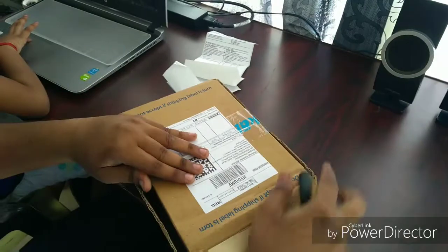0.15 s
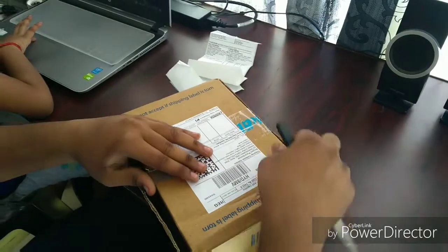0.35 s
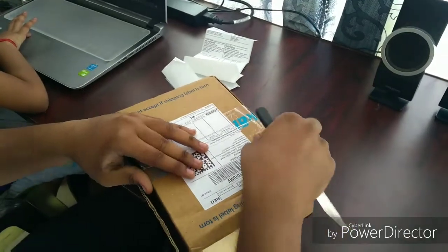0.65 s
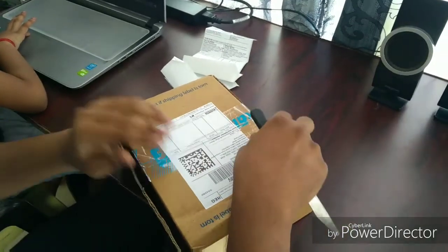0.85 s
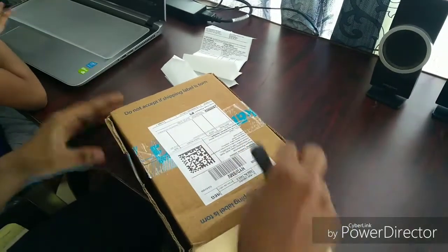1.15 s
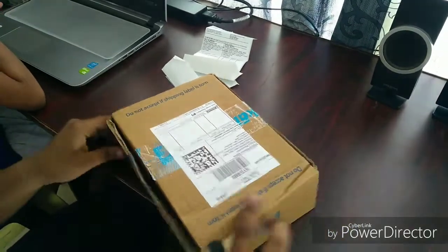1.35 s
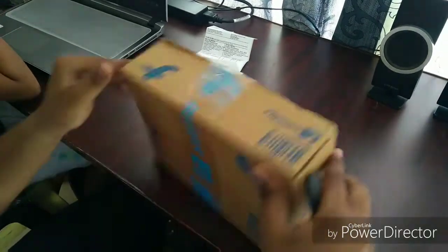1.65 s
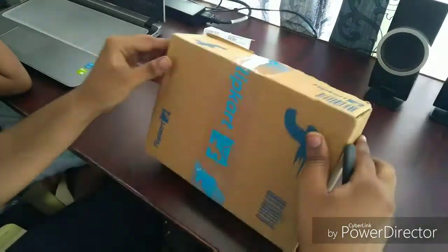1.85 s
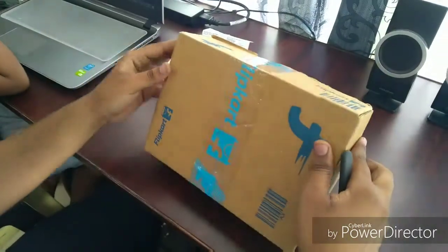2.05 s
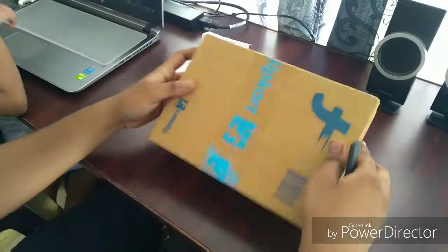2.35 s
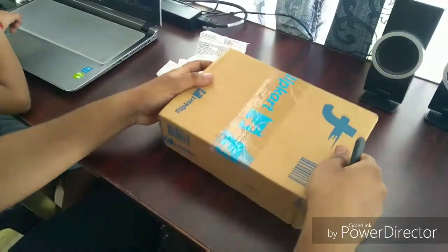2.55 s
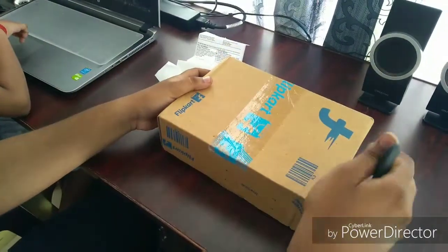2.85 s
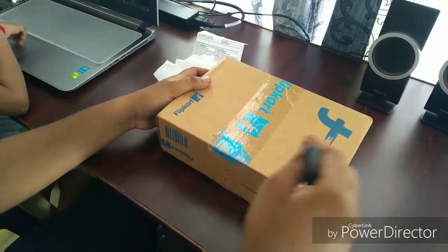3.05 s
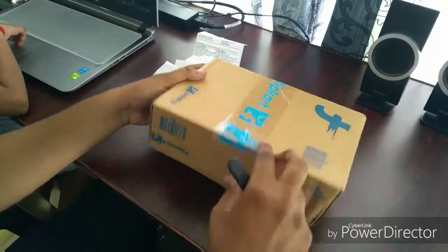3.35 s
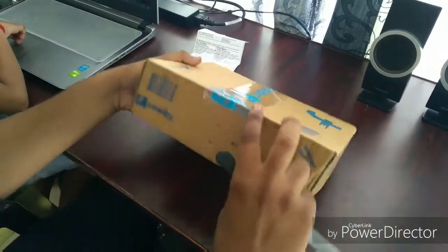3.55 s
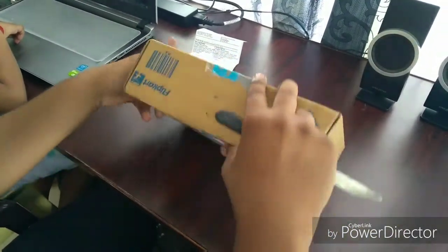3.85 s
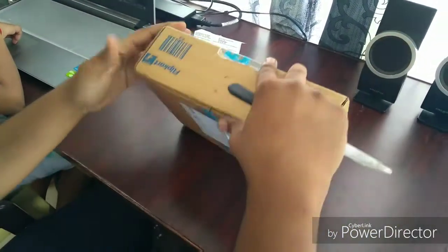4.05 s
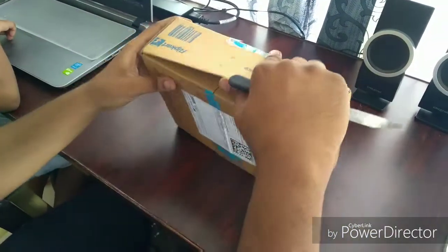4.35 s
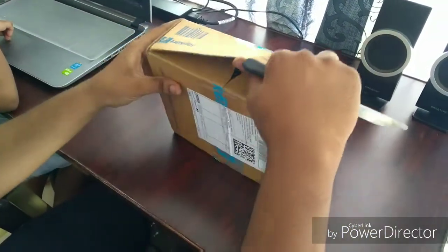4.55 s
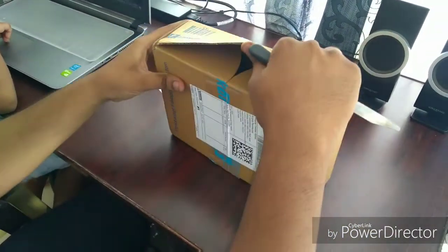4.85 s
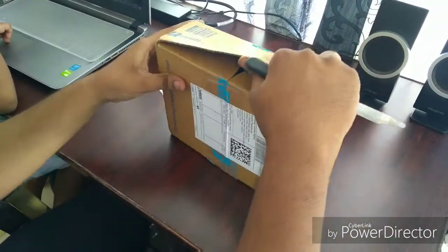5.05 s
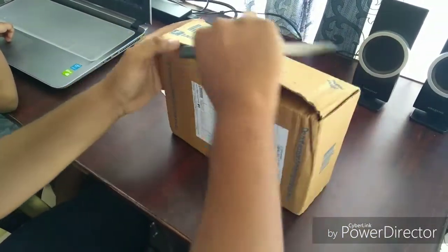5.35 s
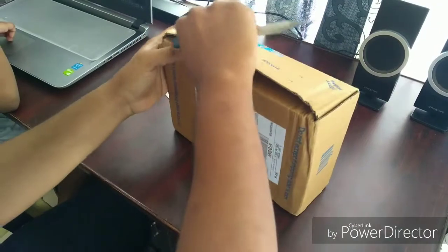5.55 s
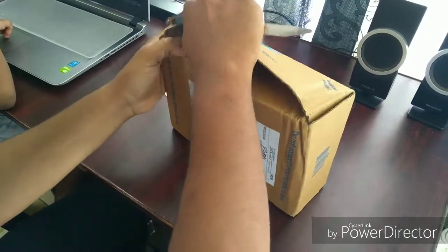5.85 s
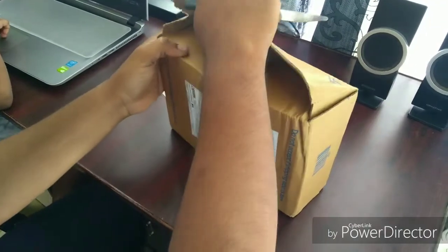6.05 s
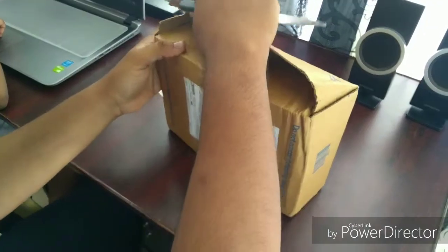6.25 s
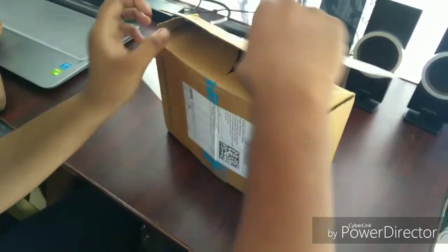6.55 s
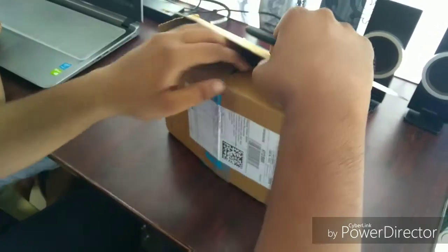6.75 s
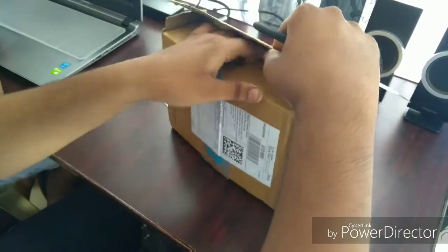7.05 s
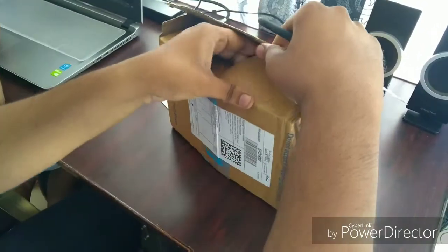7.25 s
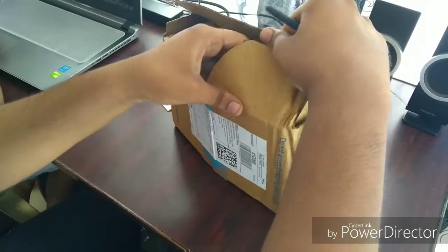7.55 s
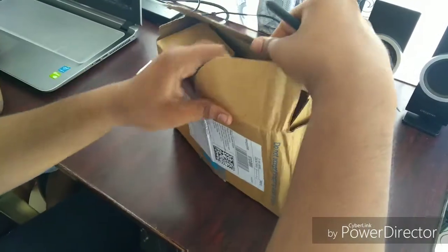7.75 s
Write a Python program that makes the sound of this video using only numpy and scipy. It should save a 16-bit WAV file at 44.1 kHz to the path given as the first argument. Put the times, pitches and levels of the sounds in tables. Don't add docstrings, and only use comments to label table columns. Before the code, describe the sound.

Dry skin-on-paper brushing and tiny ticks open the scene, followed by a flurry of boxy bumps and cardboard hiss as a parcel is flipped on a desk. After softer sliding, taped flaps are forced with sharp snaps and short tears, separated by rustling. The stereo pickup is close, with faint hiss, low room rumble and a short indoor echo; the last flap tears strongly.

```python
import sys
import numpy as np
from scipy import signal
from scipy.fft import rfft, irfft, next_fast_len
from scipy.io import wavfile
from scipy.ndimage import map_coordinates

SR = 44100
rng = np.random.default_rng(int(sys.argv[2]) if len(sys.argv) > 2 else 0)


def unload_audio(sound):
    columns = np.transpose(np.atleast_2d(sound))
    steps = np.round(np.clip(columns, -1, 1) * 32767)
    wavfile.write(sys.argv[1], SR, steps.astype(np.int16))


def invert_db(level):
    return 10 ** (np.asarray(level, dtype=float) / 20)


N = 347949

# centre_hz, width_hz, level_db
WALL_MODES = [(765, 180, -7), (1296, 538, -3), (1749, 788, 0.5), (2099, 885, -1)]
# centre_hz, width_hz, level_db
HOLLOW_MODES = [(156, 49, -6), (250, 52, -2), (345, 59.4, -2.5), (481.6, 82, -2.5), (742, 315, -9.5)]


def along(points, hz):
    f, v = np.transpose(points)
    return np.interp(np.log(hz + 1), np.log(f + 1), v)


def curves(rows):
    s, *cols = np.transpose(rows)
    return [np.interp(np.arange(N) / SR, s, c) for c in cols]


def wobble(rate):
    coarse = np.arange(0, N + 8, 8)
    knots = rng.standard_normal(int(N * rate / SR) + 4)
    return np.interp(np.arange(N), coarse, map_coordinates(knots, [coarse * rate / SR]))


def filtered(x, response):
    m = next_fast_len(N + SR // 2)
    return irfft(rfft(x, m) * response(np.fft.rfftfreq(m, 1 / SR)), m)[..., :N]


def colour(spectrum):
    return lambda hz: invert_db(along(spectrum, hz))


def body(modes):
    low, high = .5 * modes[0][0], 2 * modes[-1][0]

    def response(f):
        edge = (1j * f / low) / (1 + 1j * f / low) / (1 + 1j * f / high) ** 2
        total = 0
        for k, (centre, width, db) in enumerate(modes):
            damping = 1j * f * width
            total = total + (-1) ** k * invert_db(db) * damping / (centre ** 2 - f ** 2 + damping)
        return edge * total
    return response


def ports(pair):
    # pitch_hz, likeness (-1 to 1)
    alike = [(25, .75), (60, .9), (150, 0.75), (380, 0.77), (950, 0.43), (2380, -0.066), (5980, -0.0),
             (15000, -0.02)]
    # pitch_hz, level_db
    port_balance = [(100, 0.6), (2000, 1), (4000, 4), (6500, -12), (9000, 2.7), (14000, -2.2)]

    def mid_and_side(hz):
        turn = np.arccos(np.clip(along(alike, hz), -1, 1)) / 2
        return np.array([np.cos(turn), np.sin(turn)])
    mid, side = filtered(pair, mid_and_side)
    both = np.array([mid + side, mid - side])
    return filtered(both, lambda hz: invert_db(np.outer([.5, -.5], along(port_balance, hz))))


def quiet():
    # pitch_hz, density_db
    tone = [(15, -62.5), (25, -29), (82, -6.5), (150, 3), (250, 3), (520, -18.5), (900, -27), (1100, -47),
            (1800, -48.5), (5500, -57), (6500, -19), (7400, -47), (9000, -51), (15500, -51)]
    # time_s, level_db, pitch_hz
    whine = [
        (1.98, -100, 1960),
        (2.1, -87, 1940),
        (2.32, -90, 1960),
        (2.92, -104, 1954),
        (3.06, -83.5, 1950),
        (3.2, -88, 1930),
        (3.3, -100, 2000),
    ]
    pair = ports(filtered(rng.standard_normal((2, N)), colour(tone)))
    level_db, hz = curves(whine)
    phase = 2 * np.pi * np.cumsum(hz + 34 * wobble(120)) / SR
    whistle = invert_db(level_db + 3.3 * wobble(60)) * np.sin(phase)
    return invert_db(-66.8 + 1.7 * wobble(14)) * pair / np.std(pair.mean(0)) + whistle


def room(x):
    # pitch_hz, t60_s
    decay = [(150, 0.34), (1000, 0.26), (5000, 0.23), (12000, 0.12)]
    hz, t, z = signal.stft(rng.standard_normal((2, SR // 2)), SR, nperseg=256)
    tail = signal.istft(z * invert_db(-60 * t / along(decay, hz)[:, None]), SR, nperseg=256)[1]
    late = np.pad(x, ((0, 0), (150, 0)))
    return signal.fftconvolve(late, tail / np.linalg.norm(tail[0]), axes=1)[:, :N]


def blows():
    # start_s, level_db, face_hz, flap_db, flap_hz
    hits = [(.899, -48.5, 250, -12, 541), (1.451, -31, 346, -6, 452), (1.471, -31.5, 261, -8, 536),
            (1.583, -29, 355, 1.5, 703), (1.76, -26, 262, -1.5, 484), (1.785, -33, 245, -4, 640),
            (1.625, -38, 300, 3, 720), (1.9, -38.5, 250, -19, 441), (2.475, -52.5, 240, -2.5, 727),
            (3.755, -42.5, 251, -6, 484), (4.634, -31, 260, -3, 500), (4.796, -40.5, 260, -7, 533),
            (4.995, -50, 245, -1.5, 487), (5.22, -46.5, 347, -5.5, 659), (5.882, -46, 371, 6, 541),
            (6.064, -49, 328, 2.5, 484), (6.138, -29, 398, 9, 523), (7.254, -50, 380, 8, 530),
            (7.35, -47, 360, 7, 545), (7.427, -39.5, 363, -8, 487), (7.48, -43, 393, -4, 484),
            (7.542, -31, 364, -15, 452), (7.608, -32.5, 358, -4, 553), (7.771, -32, 250, -3, 751)]
    # start_s, level_db, desk_hz, flap_db
    bumps = [(.167, -39.5, 136, -6), (.223, -44, 159, -4), (.68, -55, 130, -15), (1.97, -48, 110, -15),
             (3.4, -52, 110, -15), (5.93, -46, 100, -15), (2.61, -56, 130, -15), (4.0, -52, 130, -15),
             (5.34, -48, 140, -15), (5.616, -45.5, 138, -4), (6.791, -44, 134, -7.5), (6.14, -35, 150, -20),
             (7.772, -39, 155, -15), (6.895, -42, 110, -23), (6.915, -47, 119, -23), (6.946, -56, 110, .6),
             (7.023, -41, 137, -14)]
    bump_flap_hz = 520
    return hits + [(*row, bump_flap_hz) for row in bumps]


def shaken():
    blow_to_desk_db, db_per_octave, t60_s = -6, 8, .4
    t = np.arange(0, N, 32) / SR
    gain = 0
    for s, db, hz, *_ in blows():
        start_db = db + blow_to_desk_db - db_per_octave * np.log2(hz / 130)
        gain = gain + (t > s) * invert_db(start_db - 60 * np.abs(t - s) / t60_s)
    return np.interp(np.arange(N) / SR, t, gain)


def knocks():
    hard_t60_s, softer_s_per_db = .036, .0012
    left_lag = 5
    swing, rattle = np.zeros(N + SR), np.zeros(N + SR)
    t = np.arange(SR // 3) / SR
    for s, db, face_hz, flap_db, flap_hz in blows():
        t60 = max(hard_t60_s + softer_s_per_db * (-25 - db), .015)
        start = round(s * SR) + 60
        at = slice(start, start + len(t))
        face = np.sin(2 * np.pi * face_hz * t)
        flap = invert_db(flap_db) * np.sin(2 * np.pi * flap_hz * t)
        swing[at] += invert_db(db + 4 - 60 * t / t60) * (1 - np.exp(-t / 0.00061)) * (face + flap)
        rattle_db = db + max(flap_db, 0) + 13
        rattle[at] += invert_db(rattle_db - 60 * t / (3.43 * t60)) * rng.standard_normal(len(t))
    airy = lambda f: (1j * f / 90) ** 2 / (1 + 1j * f / 90) ** 2
    box = filtered(swing[:N], airy) + filtered(rattle[:N], body(HOLLOW_MODES))
    return np.array([np.roll(box, left_lag), box]) * invert_db([[.8], [-.8]])


def strokes():
    # peak_s, rub_db, wall_db, rise_s, fall_s
    slides = [(.1, -53, -57, .4, .1), (.17, -57, -56, .08, .04), (.235, -55, -56, .015, .08),
              (.394, -61.5, -66, .03, .075), (.56, -79, -99, .015, .1), (.64, -75, -95, .012, .04),
              (.69, -73, -78, .015, .12), (.77, -67, -79, .03, .15), (.854, -64, -75, .05, .04),
              (.934, -63, -76, .11, .11), (1.0, -76, -90, .1, .15), (1.12, -74, -90, .05, .09),
              (1.27, -89, -99, .03, .08), (1.42, -68, -84, .11, .25), (1.475, -52, -58, .03, .3),
              (1.575, -47, -58, .07, .17), (1.768, -48.5, -56, .05, .25), (1.7, -56, -66, .15, .1),
              (1.98, -63, -73, .21, .17), (2.13, -78, -84, .1, .1), (2.21, -73, -78, .03, .15),
              (2.3, -62, -80, .09, .12), (2.425, -57.5, -80, .03, .3), (2.565, -55, -62, .15, .14),
              (2.7, -65, -74, .21, .17), (3.1, -86, -94, .8, .4), (3.3, -62, -78, .11, .4),
              (3.62, -49, -66, .42, .4), (3.774, -52, -56, .15, .21), (3.924, -51, -66, .08, .19),
              (4.08, -61, -58, .06, .06)]
    # peak_s, rub_db, wall_db, rise_s, fall_s
    pulls = [(4.12, -66, -72, .3, .25), (4.35, -56, -61, .13, .3), (4.48, -46, -64, .21, .17),
             (4.7, -63.5, -60, .3, .4), (4.98, -58, -64, .3, .15), (5.24, -56, -62, .21, .4),
             (5.49, -50, -57, .38, .19), (5.62, -56, -52, .01, .08), (5.7, -59, -58.5, .15, .48),
             (5.868, -39, -46, .011, .29), (6.125, -39, -44, .09, .03), (6.1, -44, -50, .04, .03),
             (6.15, -50, -49, .05, .2), (6.36, -67, -69, .3, .2), (6.5, -54, -66, .13, .4),
             (6.848, -51, -58.5, .25, .22), (7.05, -59, -60, .4, .55), (7.25, -50, -54, .13, .4),
             (7.4, -45, -46, .15, .09), (7.53, -43.5, -47, .17, .12), (7.64, -44, -47, .12, .25),
             (7.75, -43, -43, .2, .21)]
    contacts = np.array([-1, .67, 1.39, 3.25, 5.172, 6.772])
    take_hold_s = .03
    drop_db, roundness = 20, 1.35
    holds = np.asarray(contacts)
    t, power = np.arange(0, N, 32) / SR, 0
    for s, rub_db, wall_db, rise, fall in slides + pulls:
        away = np.abs(t - s) / np.where(t < s, rise, fall)
        held = np.clip((t - holds[holds <= s].max()) / take_hold_s, 0, 1) ** 4
        peaks_db = np.array([[rub_db], [wall_db]])
        power = power + held * invert_db(peaks_db - drop_db * away ** roundness) ** 2
    return [np.interp(np.arange(N) / SR, t, np.sqrt(p)) for p in power]


def rubbing(response, grain_rate, grain_db, slow_db):
    catch = invert_db(grain_db * wobble(grain_rate) + slow_db * wobble(35))
    pair = ports(filtered(catch * rng.standard_normal((2, N)), response))
    return pair / np.std(pair.mean(0))


def handling():
    # pitch_hz, density_db
    rub_colour = [(880, -17), (1500, -19.5), (1640, -14.5), (1900, -12.5), (3350, -6.5), (3880, -3),
                  (5120, -5.5), (6560, 3), (7320, 0.5), (8160, -4.5), (13300, -10), (15200, -6.5),
                  (16000, -56.5)]
    # centre_hz, width_hz, level_db
    desk_modes = [(92.2, 16.6, -1), (131, 19, 1.5), (153.4, 30, 0)]
    # time_s, level_db
    grip_points = [(0, -51), (.15, -50), (.52, -64), (.75, -59), (1.38, -69), (1.48, -51), (1.65, -47),
                   (1.87, -55), (2.05, -66), (2.6, -62), (3.1, -73), (3.7, -58), (4.1, -67), (4.7, -60),
                   (5.12, -67), (5.4, -56), (6.7, -66), (7.89, -49)]
    wall_to_hollow_db, grip_to_desk_db, hollow_top_hz = -5, -4, 1150
    slide, wall = strokes()
    grip = invert_db(curves(grip_points)[0])
    pan_db = -2 + .5 * np.arange(N) / SR
    lean = invert_db(np.outer([.5, -.5], pan_db))
    rub = invert_db(1.53) * lean * slide * rubbing(colour(rub_colour), 650, grain_db=1, slow_db=1.9)
    panel = invert_db(-0.4) * wall * rubbing(body(WALL_MODES), 300, grain_db=1.5, slow_db=1.7)
    hum = lambda f: body(HOLLOW_MODES)(f) / (1 + (f / hollow_top_hz) ** 6)
    hollow_gain = invert_db(-1.78) * np.hypot(grip, invert_db(wall_to_hollow_db) * wall)
    hollow = hollow_gain * rubbing(hum, 100, grain_db=2, slow_db=0.5)
    desk_gain = invert_db(-3.4) * np.hypot(invert_db(grip_to_desk_db) * grip, shaken())
    desk = desk_gain * rubbing(body(desk_modes), 44, grain_db=1, slow_db=2.6)
    return rub + panel + hollow + desk


def snaps():
    # start_s, level_db, panel_db, panel_hz
    releases = [(.2239, -37, -6, 780), (1.4505, -42, -2.5, 1170), (1.4611, -33, -5.5, 886),
                (1.5864, -31.5, 5.5, 820), (1.7643, -23, -2.5, 1263), (1.8791, -33, -18, 825),
                (4.539, -26, -29, 1120), (4.6352, -10, -9, 1386), (4.649, -21, -14, 923),
                (4.8, -21, -8, 1300), (5.6146, -25, -13.5, 1090), (5.8317, -29, -12, 1410),
                (5.885, -23, -2.5, 1430), (5.8964, -23, -6.5, 810), (5.9086, -19, -19.5, 950),
                (6.109, -19, -9, 1890), (6.1385, -10.5, -2.5, 1250), (6.2936, -37, -16, 1050),
                (6.797, -33, -17, 1210), (7.0818, -22, -23.5, 870), (7.4294, -36.5, 1.5, 1370),
                (7.4881, -34, -4, 1320), (7.5424, -28, -12, 1160), (7.6103, -32, 6, 1250),
                (7.767, -24, -9, 820)]
    # start_s, level_db, panel_db, panel_hz, t60_s
    tears = [(.232, -38, -10, 800, .07), (1.4735, -27, -8, 1130, .045), (5.8645, -20, -17, 1270, .03),
             (5.94, -26, -14, 1190, .06), (6.097, -29, -8, 1500, .03), (7.385, -33, -10, 1300, .08),
             (7.536, -35, -12, 1200, .06), (7.735, -31, -6, 1240, .06), (7.7695, -11, -10, 900, .018),
             (2.55, -38, -14, 1300, .025), (1.759, -33, 0, 700, .04)]
    # start_s, level_db, panel_db
    ticks = [(.1426, -40, -18), (.389, -49, -9), (.6794, -52, -16), (.7612, -46, -10.5), (.8335, -39, -25),
             (.8517, -35, -38), (.9286, -38, -27), (1.4047, -57, -15), (2.3486, -43, -33), (2.42, -48, -33),
             (2.6758, -49, 3), (2.76, -45, -30), (3.2765, -46, -28), (3.9164, -45, -15), (5.0271, -47, -3),
             (5.2023, -58, -5), (5.672, -43, -19), (5.7418, -42, -8.5), (6.2786, -45, -18),
             (6.4572, -46, -11), (6.783, -43, -4), (6.9449, -49, 2.5), (7.0268, -41.5, -5),
             (.3696, -59, -20), (.5482, -67, -30), (.634, -61, -30), (.7148, -58, -20), (.7482, -55, -20),
               (.8979, -48, -20), (1.0994, -64, -30), (1.254, -66, -30), (1.5369, -38, -20),
               (2.1944, -61, -30), (2.2892, -53, -25), (2.3974, -50, -20), (2.9173, -65, -30),
               (2.957, -66, -5), (3.2515, -62, -20), (3.8372, -42, -20), (4.2767, -46, -20),
               (5.1357, -52, -25), (6.0636, -36, -15), (7.0484, -44, -15)]
    # pitch_hz, density_db
    crack_colour = [(880, -67), (1500, -7.5), (2300, -19), (2740, -8), (4080, -1.5), (5020, -7.5),
                    (6500, 4.5), (10600, -15), (13300, -15), (15200, -23), (16000, -47)]
    tick_hz, snap_t60_s = 950, .0125
    crack, flick, swing = np.zeros((2, N + SR)), np.zeros((2, N + SR)), np.zeros(N + SR)
    t = np.arange(SR // 10) / SR
    short = releases + [(*row, tick_hz) for row in ticks]
    for s, db, panel_db, hz, t60 in [(*row, snap_t60_s) for row in short] + tears:
        pan_db = -7.5 + .8 * s
        shape = invert_db(-60 * t / t60) * (1 - np.exp(-t / (0.067 * t60)))
        noise = rng.standard_normal((3, len(t)))
        noise *= np.linalg.norm(shape) / np.linalg.norm(shape * noise, axis=1, keepdims=True)
        start = round(s * SR) - 30
        at = slice(start, start + len(t))
        sides_db = pan_db * np.array([[.5], [-.5]])
        crack[:, at] += invert_db(db + sides_db) * shape * (noise[:2] + .3 * noise[2])
        push = invert_db(db + panel_db) * shape
        flick[:, at] += push * (noise[2] + .5 * noise[:2])
        swing[at] += push * np.sin(2 * np.pi * hz * t)
    air = invert_db(7) * filtered(crack[:, :N], colour(crack_colour))
    wall = invert_db(19.5) * filtered(flick[:, :N], body(WALL_MODES))
    return air + wall + invert_db(4.5) * swing[:N]


def scene():
    sharp, dull = snaps(), knocks()
    echoes = invert_db(-8.5) * room(sharp) + invert_db(-4) * ports(room(dull))
    return sharp + dull + echoes + handling() + quiet()


def roll_off(x):
    return signal.sosfilt(signal.butter(12, 15800, fs=SR, output="sos"), x)


def record(dry):
    return roll_off(dry)


dry = scene()
out = record(dry)
unload_audio(out)
```